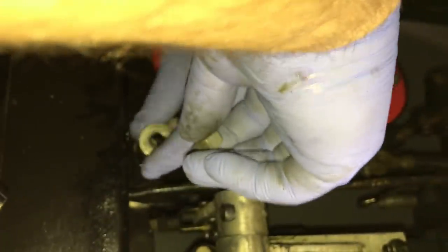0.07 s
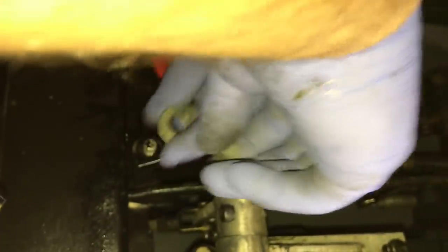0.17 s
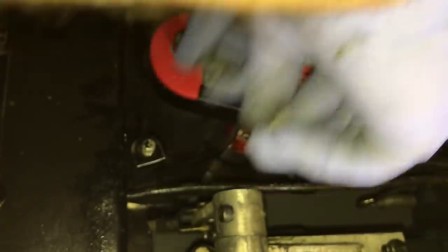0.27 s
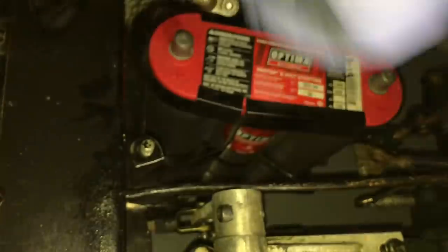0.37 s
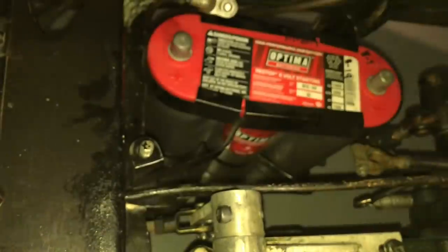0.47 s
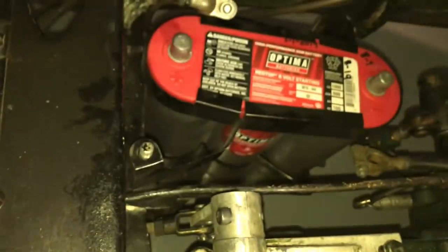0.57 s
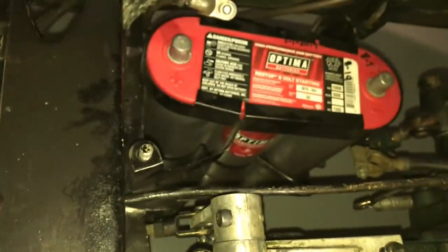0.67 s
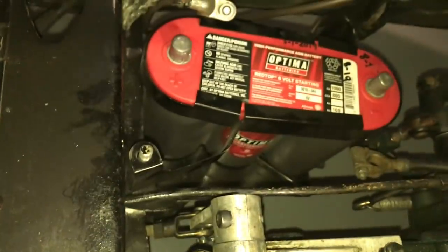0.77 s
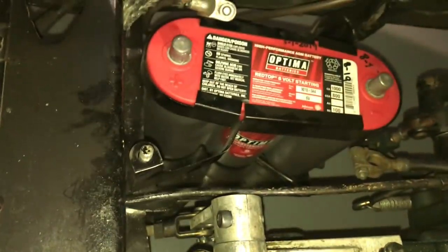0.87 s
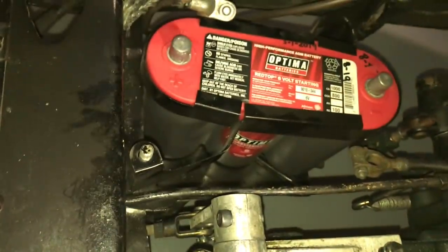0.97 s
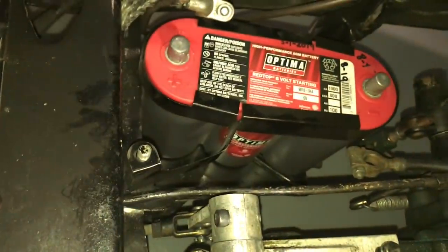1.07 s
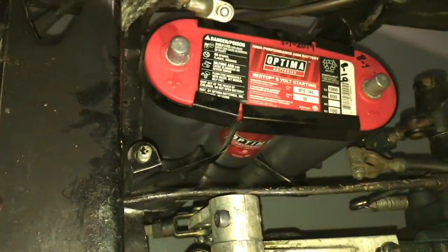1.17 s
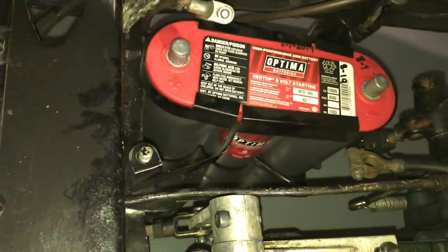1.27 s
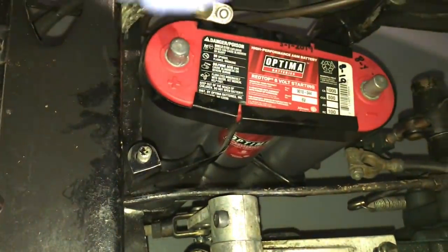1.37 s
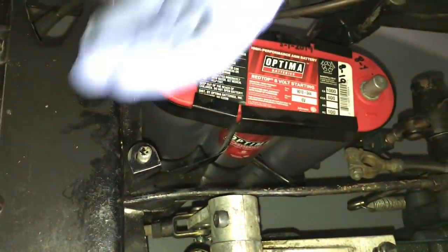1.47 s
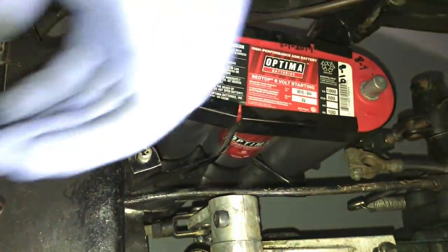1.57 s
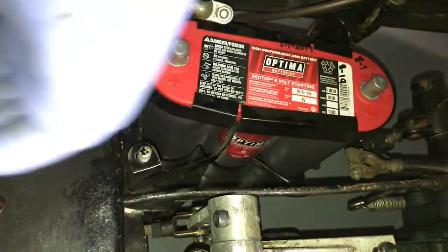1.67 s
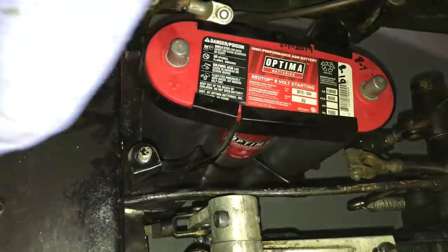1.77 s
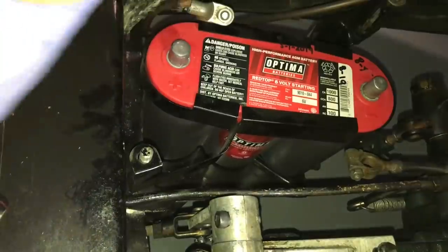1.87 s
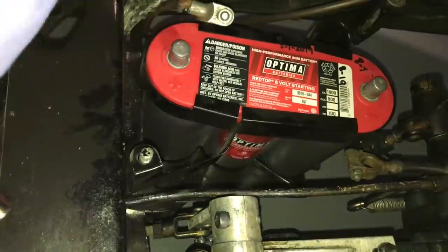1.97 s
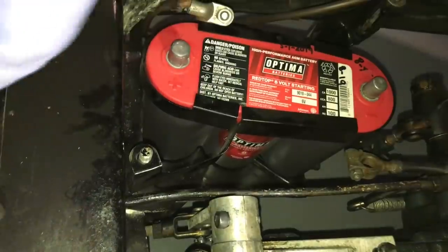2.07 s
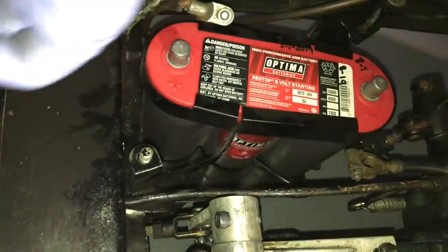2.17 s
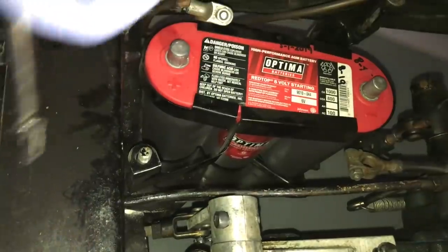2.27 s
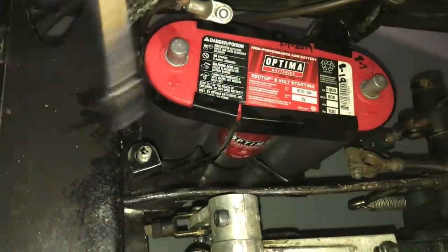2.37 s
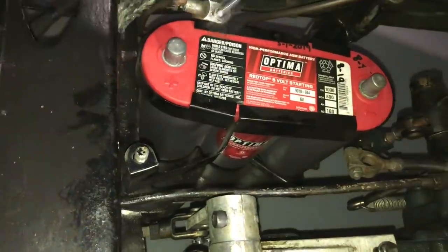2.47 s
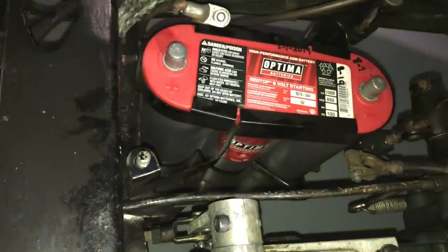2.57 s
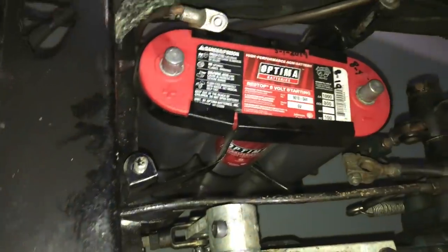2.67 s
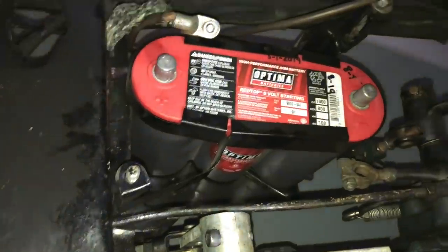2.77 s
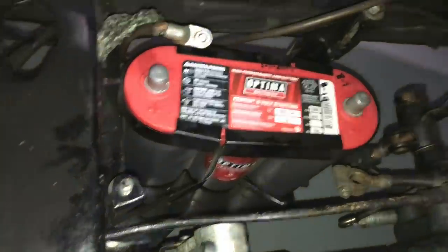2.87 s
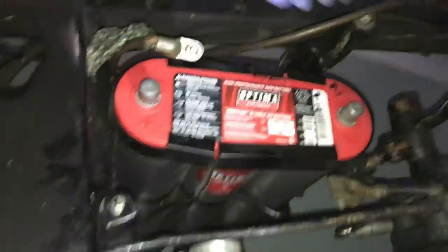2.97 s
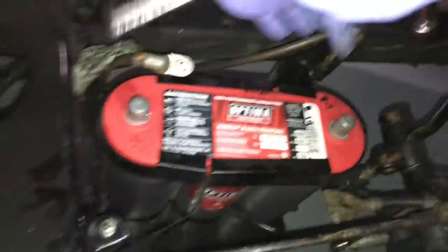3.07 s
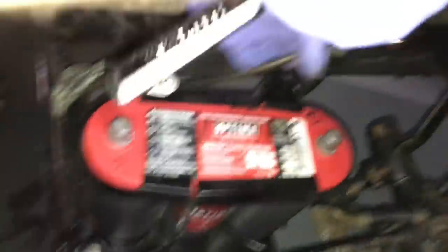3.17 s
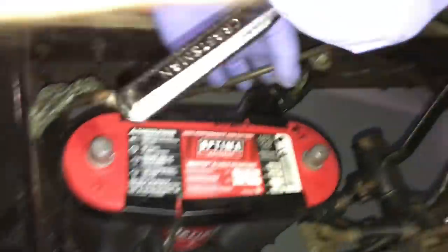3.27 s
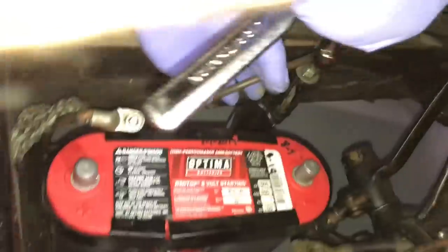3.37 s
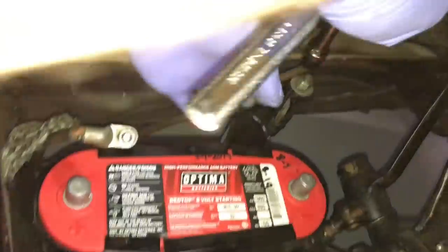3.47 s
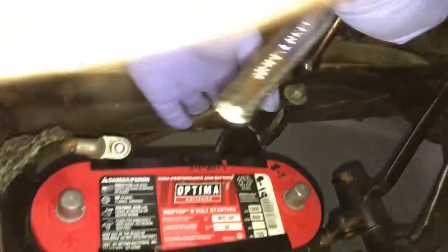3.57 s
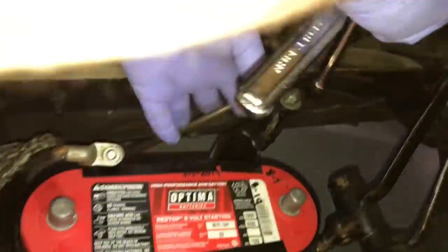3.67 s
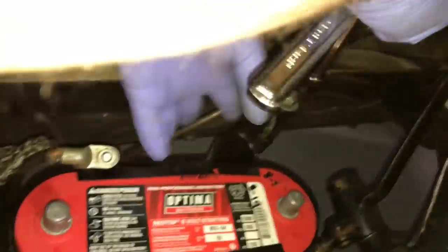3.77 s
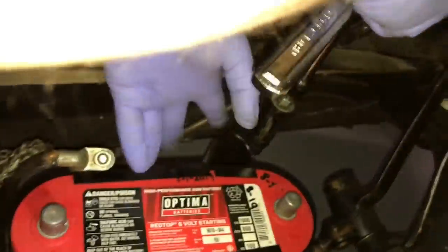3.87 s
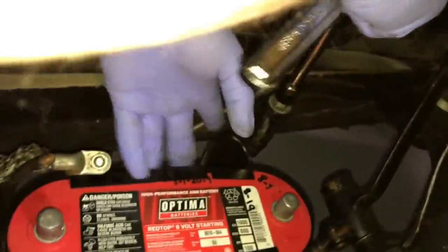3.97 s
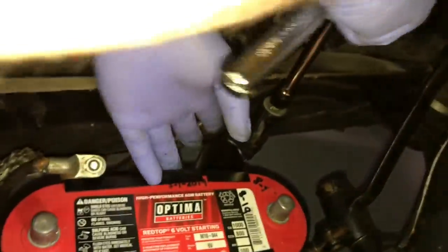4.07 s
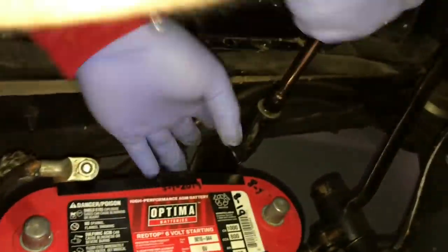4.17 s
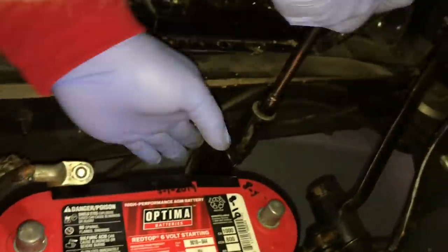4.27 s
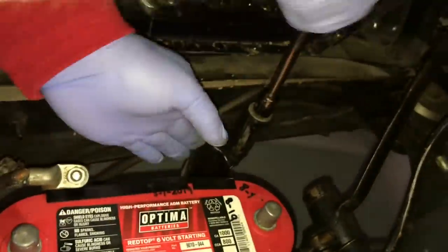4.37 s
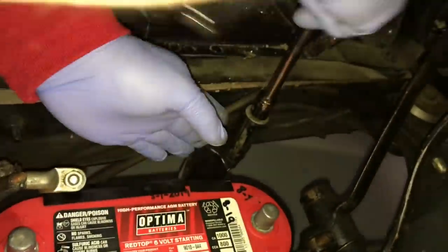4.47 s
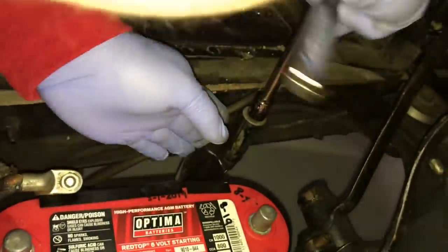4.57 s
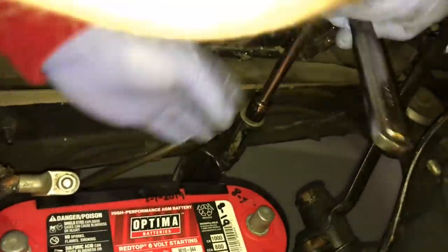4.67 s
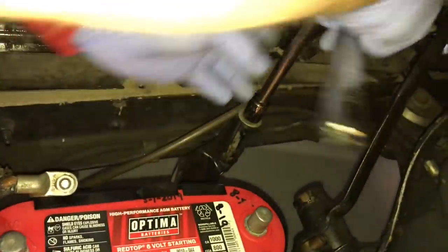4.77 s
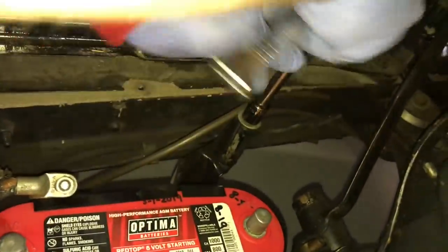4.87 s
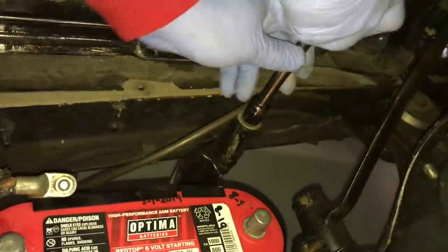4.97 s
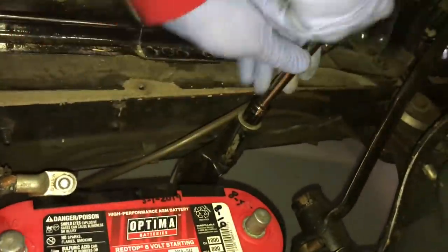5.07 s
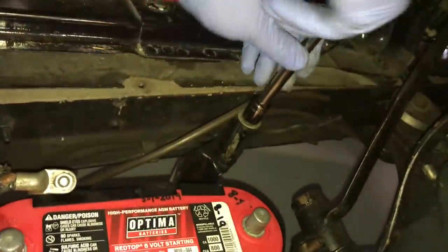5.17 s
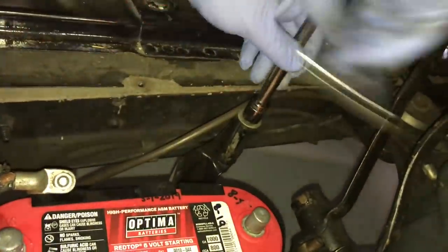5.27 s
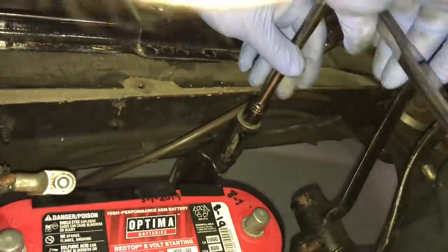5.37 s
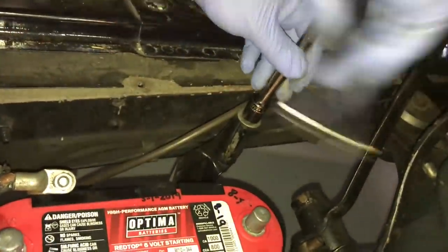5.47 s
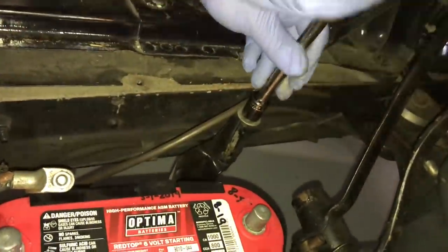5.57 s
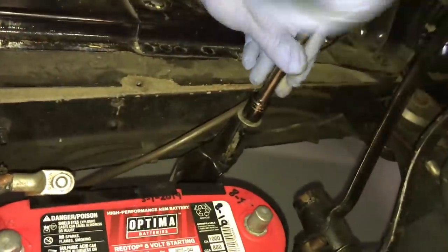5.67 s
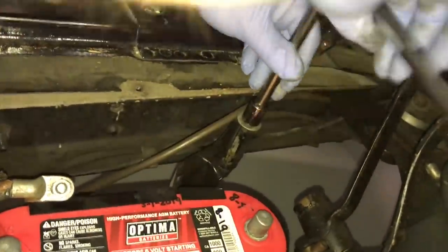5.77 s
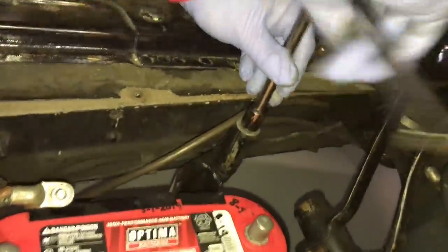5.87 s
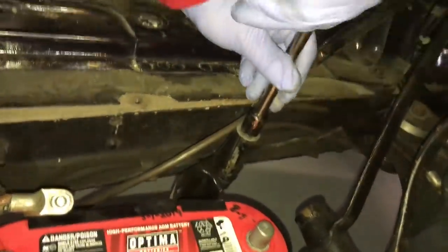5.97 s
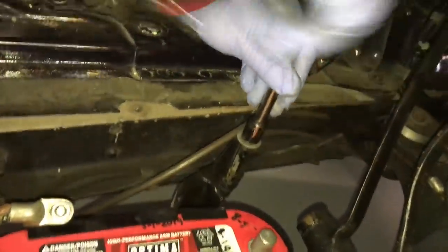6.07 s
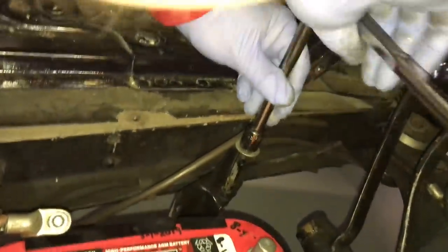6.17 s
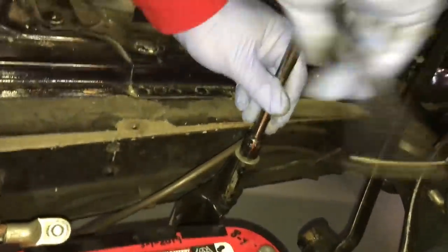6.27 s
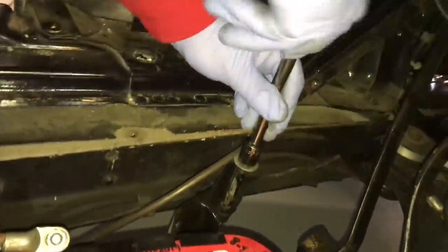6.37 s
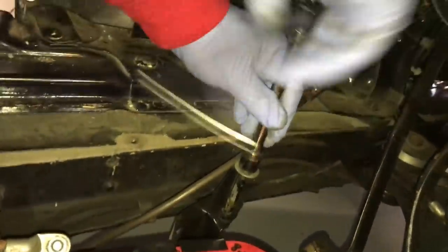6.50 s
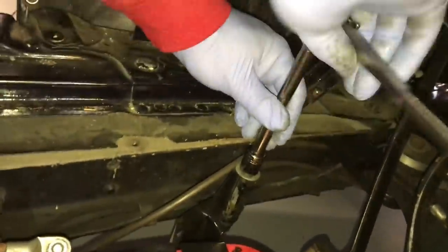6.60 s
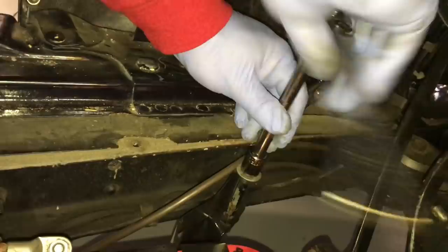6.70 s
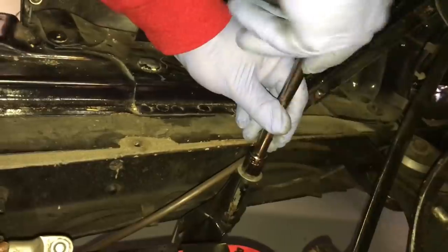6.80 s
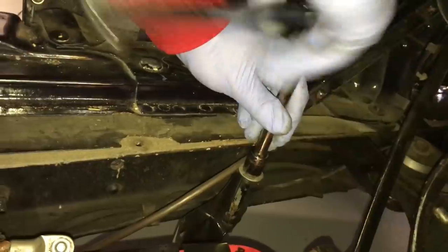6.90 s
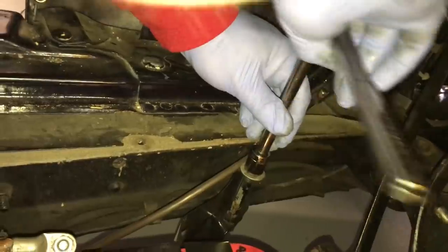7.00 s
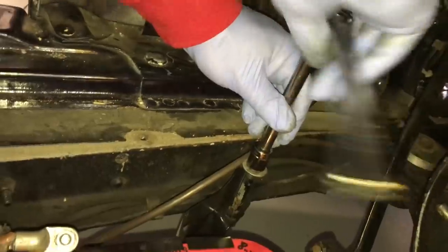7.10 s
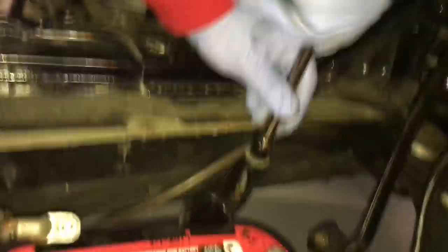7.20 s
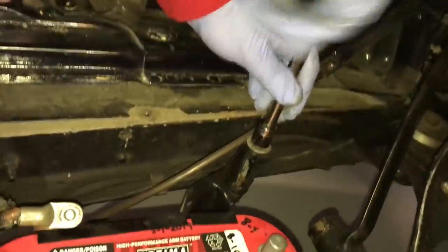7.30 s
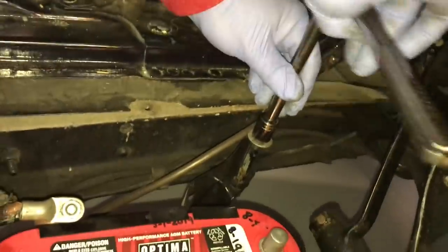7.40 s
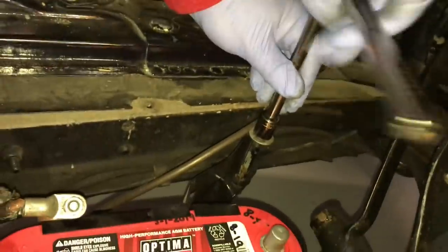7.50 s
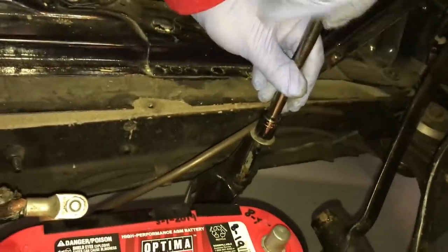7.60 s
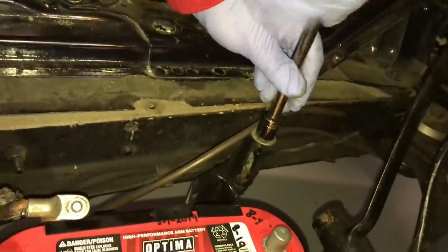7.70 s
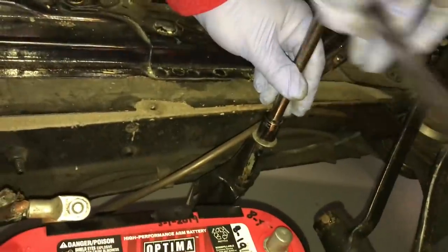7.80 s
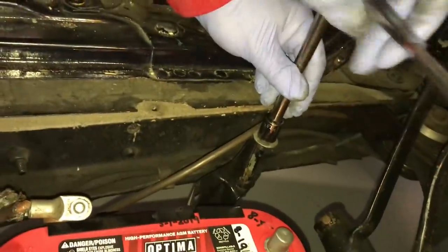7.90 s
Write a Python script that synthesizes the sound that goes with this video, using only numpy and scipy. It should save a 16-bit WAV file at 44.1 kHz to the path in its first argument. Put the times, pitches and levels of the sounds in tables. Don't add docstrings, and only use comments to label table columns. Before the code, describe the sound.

A quiet garage with a faint low hum, close microphone and short dull echo. At 0 s a part let go gives a soft sheet-metal clank; gloves rustle. Around 0.74 and 0.82 s a small nut touches metal, the second ring sharper and very high. Faint fumbling taps follow from 1.1 to 2.0 s, then at 2.06 s a loud, hard socket snap with a bright spring-ball click and quick settling. Sleeves brush and small ticks pass until 3.7 s. From 3.78 to 4.2 s the loose socket rattles brightly on the nut with dull bodywork knocks. At 4.8-5.0 s a slow swing gives separate clicks, with a knock at 5.13. From 5.4 s, quick runs of about seven to ten crisp clicks recur roughly every 0.4 s, slowing slightly within each run and ending in a knock, with rubbing between; the last run is cut off near 7.94 s.

```python
import sys
import numpy as np
from scipy import signal
from scipy.io import wavfile

SR = 44100
rng = np.random.default_rng(int(sys.argv[2]) if len(sys.argv) > 2 else 0)


def volts_from_decibels(level):
    exponent = np.asarray(level, float) / 20
    return 10 ** exponent


def digitize_waveform(pressure):
    field = np.atleast_2d(pressure).T
    bounded = np.clip(field, -1, 1)
    quanta = np.round(bounded * 32767).astype(np.int16)
    wavfile.write(sys.argv[1], SR, quanta)


N = 350154

ON_NUT_S, SEATED_S = 3.78, 4.78

# mode_hz, level_db, t60_s
HEAD_MODES = [(5920, -3, .045), (6620, -5, .045), (7480, -8, .04), (8100, -13, .025), (9010, -1, .045),
              (9920, -3, .04), (10900, -8, .035), (11700, -9, .025), (12500, -8, .025), (13300, -1, .03),
              (13900, -7, .025), (14700, -3, .035), (15400, -8, .03)]
# mode_hz, level_db, t60_s
EXTENSION_MODES = [(1898, -3, 0.23), (2350, -6, 0.15), (2540, -6.5, 0.18), (2980, 3.5, 0.057),
                   (3490, 3, 0.062), (4120, -3, 0.06), (4340, 4.5, 0.037), (4660, 5, 0.029),
                   (5850, -9.5, 0.019), (5160, -16.5, 0.18)]
# mode_hz, level_db, t60_s
BRACKET_MODES = [(620, -15, 0.04), (597, -7.5, 0.17), (726, -8.5, 0.35), (865, 1.5, 0.12), (1045, -1, 0.25),
                 (1204, 9, 0.053), (1830, -19.5, 0.027)]
# mode_hz, level_db, t60_s
DRIVE_MODES = [(5970, 18.5, 0.065), (6360, -7.5, 0.024), (6920, 13, 0.037), (8060, 15.5, 0.071),
               (8360, -15, 0.026), (10380, -25, .03), (12000, -32.5, 0.015), (13200, -30, 0.017)]


def rows(table):
    return np.transpose(table).astype(float)


def band(x, low_hz, high_hz):
    return signal.sosfilt(signal.butter(2, [low_hz, min(high_hz, .45 * SR)], "band", fs=SR, output="sos"), x)


def fade(x, seconds):
    return signal.lfilter([1], [1, -np.exp(-1 / (max(seconds, 1e-5) * SR))], x)


def drift(rate_hz):
    time_constant_s = 1 / (2 * np.pi * rate_hz)
    slow = fade(fade(rng.standard_normal(N + SR), time_constant_s), time_constant_s)[SR:]
    return slow / slow.std()


def resonate(x, hz, t60_s):
    r, w = volts_from_decibels(-60 / (t60_s * SR)), 2 * np.pi * hz / SR
    return np.sqrt(2 - 2 * r * r) * signal.lfilter([0, np.sin(w)], [1, -2 * r * np.cos(w), r * r], x)


def swell(table):
    t = np.arange(N) / SR
    return sum(volts_from_decibels(db) * np.exp(-((t - s) / half) ** 2) for s, half, db in table)


def strike(times, level_db, modes, width_hz, crack_db, crack_s, rise_s, scatter_db=3.5):
    at = np.minimum((times * SR).astype(int), N - 1)
    hz, mode_db, t60_s = rows(modes)
    share = volts_from_decibels(mode_db + scatter_db * rng.standard_normal((len(at), len(hz))))
    share = share / np.sqrt((share ** 2).sum(axis=1, keepdims=True))
    blows = np.zeros(N) + 1e-18
    blows[at] = volts_from_decibels(level_db + crack_db) / (1 + rise_s * SR)
    out = fade(fade(blows, rise_s), crack_s) * rng.standard_normal(N)
    white = rng.standard_normal((2, N))
    for k in range(len(hz)):
        blows[at] = volts_from_decibels(level_db) * share[:, k] / (1 + rise_s * SR)
        rattle = fade(fade(blows, rise_s), t60_s[k] / np.log(1000)) * white[k % 2]
        out += resonate(rattle, hz[k], np.log(1000) / (np.pi * width_hz))
    low_hz, high_hz = .6 * hz.min(), 1.3 * hz.max()
    return band(band(out, low_hz, high_hz), low_hz, high_hz)


def hum():
    # start_s, level_db
    thumps = [
        (3.556, -33),
        (4.615, -38),
        (7.17, -39),
    ]
    # centre_s, level_db
    sways = [
        (0.0, -60),
        (.57, -77.5),
        (1.88, -59.5),
        (5.44, -47),
        (6.5, -50),
        (7.94, -58),
    ]
    sway_s, thump_rise_s, thump_fall_s = 0.066, 0.0019, 0.016
    s, thump_db = rows(thumps)
    push = np.zeros(N)
    push[(s * SR).astype(int)] = volts_from_decibels(thump_db)
    thump = fade(fade(push, thump_fall_s), thump_rise_s) / (thump_rise_s * SR)
    t = np.arange(N) / SR
    sway = sum(volts_from_decibels(db) * np.exp(-((t - at) / sway_s) ** 2) for at, db in sways)
    murmur = volts_from_decibels(-62 + 6.5 * (t > ON_NUT_S) + drift(3.7))
    low = band(rng.standard_normal(N), 45.5, 109)
    motor = volts_from_decibels(-67) * resonate(rng.standard_normal(N), 152, .1)
    return low / low.std() * (murmur + sway + thump) + motor


def garage(x):
    t60_s, level_db, onset_s = 0.21, -19.5, 0.00095
    t = np.arange(SR // 2) / SR
    tail = band(rng.standard_normal(len(t)), 200, 4900) * volts_from_decibels(-60 * t / t60_s) * (1 - np.exp(-t / onset_s))
    return volts_from_decibels(level_db) * signal.fftconvolve(x, tail / np.sqrt((tail ** 2).sum()))[:N]


def rustle_levels():
    # time_s, level_db
    hands = [(0, -63.5), (.5, -60.5), (.73, -58.5), (.9, -67), (1.5, -68), (1.66, -64.5), (1.9, -62.5),
             (2.25, -54.5), (2.45, -67), (3.05, -62.5), (3.2, -59), (3.56, -53.5), (4.0, -64), (4.27, -71),
             (4.85, -49.5), (5.32, -67), (5.45, -63), (7.94, -58)]
    # peak_s, level_db
    loads = [(3.3, -59.5), (3.96, -40.5), (4.129, -36.5), (4.45, -52), (4.88, -52), (5.22, -48),
             (5.6, -45.5), (6.0, -46.5), (6.382, -41), (6.85, -42.5), (7.24, -48), (7.74, -52.5)]
    # level_re_hands_db, share of the hands' swing [ratio], level_re_load_db
    layer_mix = [
        (-3, 0.91, 1.5),
        (-0.5, 0.93, -23),
        (-3.5, 0.59, -22),
    ]
    rise_s, fall_s = 0.073, 0.11
    t = np.arange(N) / SR
    hands_db = np.interp(t, *rows(hands))
    load = sum(volts_from_decibels(db) * np.exp(np.minimum((t - s) / rise_s, (s - t) / fall_s)) for s, db in loads)
    mean_db = hands_db.mean()
    return [volts_from_decibels(mean_db + hands_re_db + share * (hands_db - mean_db)) + volts_from_decibels(load_re_db) * load
            for hands_re_db, share, load_re_db in layer_mix]


def rustle(patchy_db=1.5, grain_db=3, grains_per_s=900, steel_db=-7):
    # band_hz, density_db [dB per Hz]
    colour = [(76, -31), (130, 6.5), (216, 1.5), (404, 14.5), (448, -21), (582, -12), (774, -9.5),
              (1810, -14.5), (4890, -17), (12700, -25), (15500, -19.5), (16500, -49)]
    # mode_hz, level_db
    sung_modes = [(1200, -1), (2500, -7), (3500, -4), (3700, -1), (4350, 1.5), (6100, -4)]
    in_hand_s, grind_db = 1.78, 4
    hz, colour_db = rows(colour)
    grains = (rng.random(N) < grains_per_s / SR) * volts_from_decibels(grain_db * np.minimum(rng.exponential(1, N), 4))
    white = rng.standard_normal((2, N)) * (1 + 0.15 * fade(grains, 0.00094))
    layers = np.zeros((3, N))
    together = drift(14)
    edges = 15900 / 2 ** np.arange(7, -.1, -.5)
    for k, (low, high) in enumerate(zip(edges, edges[1:])):
        centre = np.sqrt(low * high)
        centre_db = np.interp(np.log(centre), np.log(hz), colour_db)
        gain = volts_from_decibels(centre_db + patchy_db * (together + drift(3.1)))
        layers[np.searchsorted([500, 4500], centre)] += gain * band(white[k % 2], low, high)
    layers[0] = band(layers[0], 110, 430)
    layers /= layers.std(axis=1, keepdims=True)
    t = np.arange(N) / SR
    singing = sum(volts_from_decibels(db + 3.5 * drift(3)) * resonate(white[0], mode_hz, .022) for mode_hz, db in sung_modes)
    layers[1] += volts_from_decibels(steel_db + grind_db * (t > SEATED_S)) * (t > in_hand_s) * singing / singing.std()
    return sum(gain * layer for gain, layer in zip(rustle_levels(), layers))


def swishes():
    # centre_s, half_length_s, level_db
    brushes = [(0.752, 0.16, -59.5), (3.625, 0.11, -56), (5.015, 0.17, -60), (6.37, 0.055, -47.5),
               (7.555, 0.1, -52), (2.672, 0.028, -56.5), (2.748, 0.055, -58.5), (3.032, 0.02, -49),
               (3.135, 0.024, -51.5), (3.237, 0.016, -55), (3.963, 0.017, -46), (7.45, 0.015, -50),
               (7.862, 0.013, -50.5)]
    # centre_s, half_length_s, level_db
    rubs = [(1.14, 0.027, -65), (1.43, 0.025, -68), (1.68, 0.054, -77), (3.2, 0.063, -58.5),
            (4.44, .06, -58.5), (4.72, 0.045, -52.5), (5.06, 0.1, -51.5), (5.285, .012, -55.5)]
    # centre_s, half_length_s, level_db
    slides = [
        (.94, 0.075, -68),
        (1.87, 0.23, -60),
        (4.57, 0.089, -62),
        (5.05, 0.12, -55.5),
    ]
    # mode_hz, level_db
    sliding_modes = [(1020, 1), (2290, -8.5), (3200, -1), (3570, -5), (4100, -2), (4320, -9), (5550, -6),
                     (6140, -12.5)]
    hiss = band(band(rng.standard_normal(N), 5100, 18000), 2500, 18000)
    rub = band(rng.standard_normal(N), 870, 5000) * volts_from_decibels(2.7 * drift(30))
    white = rng.standard_normal(N)
    song = sum(volts_from_decibels(db + 3.0 * drift(8)) * resonate(white, mode_hz, .05) for mode_hz, db in sliding_modes)
    return swell(brushes) * hiss / hiss.std() + swell(rubs) * rub / rub.std() + swell(slides) * song / song.std()


def loose_parts():
    # start_s, level_db
    clank = [(.0003, -33)]
    # mode_hz, level_db, t60_s
    sheet_modes = [(474, 0, 0.29), (730, 5.5, 0.21), (1270, 4.5, 0.17), (1950, -8, 0.19), (2379, -20, 0.12),
                   (3000, -30, 0.45), (4000, -1, 0.12), (4700, 2, 0.083), (6100, -15, 0.11),
                   (6160, -25, 0.097)]
    # start_s, level_db
    nut_touches = [
        (.7357, -26),
        (.824, -17.5),
        (.8268, -44),
        (1.5095, -43),
        (1.632, -42),
        (1.663, -46),
    ]
    # mode_hz, level_db, t60_s
    nut_modes = [(2500, -34, .015), (7200, -16, .015), (9313, -10, .015), (12080, -16, .04),
                 (12900, -6, .035), (13200, 0, .04), (13270, -17, .2), (13400, -6, .04), (14800, -10, .015)]
    # start_s, level_db
    snap = [
        (2.0623, -7),
        (2.0643, -10),
        (2.0708, -10),
        (2.080, -19),
        (2.14, -48),
    ]
    # mode_hz, level_db, t60_s
    socket_modes = [(330, -14, .07), (570, -2, .08), (715, -1, .07), (1360, -1, .06), (1900, -9, .07),
                    (2420, -4, .065), (2950, -7, .05), (3380, -3, .045), (3570, 1, .045), (3800, 0, .04),
                    (4580, -7, .06), (5020, -7, .07), (5640, -1, .04), (6270, -10, .09)]
    # start_s, level_db
    ball_snap = [
        (2.0623, -11),
        (2.0643, -10),
        (2.0708, -22),
        (2.080, -28),
        (2.14, -50),
    ]
    # mode_hz, level_db, t60_s
    ball_modes = [(8700, -3.5, 0.07), (11300, -8, 0.026), (13270, 11.5, .025), (14100, 2, .045),
                  (15100, -10.5, .03)]
    # start_s, pitch_hz, level_db,
    # t60_s
    pings = [(.0003, 2379, -38, 0.2), (.0003, 6202, -40, 0.097), (2.065, 5080, -60, 1.2),
             (3.778, 7200, -39, 0.14), (4.015, 7200, -36, 0.13), (4.0135, 8150, -24, .035),
             (4.1182, 6150, -21, .04), (5.846, 3100, -36, .05), (5.846, 6300, -37, .05)]
    out = strike(*rows(clank), sheet_modes, width_hz=220, crack_db=6, crack_s=.012, rise_s=.0002)
    out += strike(*rows(nut_touches), nut_modes, width_hz=120, crack_db=-8, crack_s=.0015, rise_s=.0002)
    out += strike(*rows(snap), socket_modes, width_hz=150, crack_db=5, crack_s=.003, rise_s=.0003, scatter_db=2)
    out += strike(*rows(ball_snap), ball_modes, width_hz=300, crack_db=3, crack_s=.002, rise_s=.0003, scatter_db=2)
    for s, hz, level_db, t60_s in pings:
        start = int(s * SR)
        t = np.arange(N - start) / SR
        out[start:] += volts_from_decibels(level_db - 60 * t / t60_s) * np.sin(2 * np.pi * hz * t)
    return out


def contacts():
    # start_s, bright_db, steel_db, bracket_db, bodywork_db
    handling = [(1.076, -71, -75, -54.5, -54.5), (1.495, -88, -85, -61, -36), (1.515, -90, -89, -63, -49),
                (1.535, -86, -78, -71, -48), (1.6296, -75, -45, -39, -41), (1.642, -80, -48, -51, -45),
                (1.66, -80, -62, -53, -36), (1.69, -80, -59, -51, -45), (1.9278, -82, -44, -45, -32.5),
                (1.97, -46, -42, -45, -31.5), (2.0071, -65.5, -56, -37, -32.5), (2.022, -60, -43, -34, -30),
                (2.046, -51, -30.5, -29, -46.5), (2.432, -55, -61, -62, -70.5),
                (2.529, -33.5, -53, -76.5, -77), (2.7212, -38, -47, -59, -64.5),
                (3.013, -40.5, -56.5, -52, -54.5), (3.2687, -76.5, -60.5, -43.5, -71.5),
                (3.505, -40.5, -47, -47.5, -34), (3.555, -41, -71, -58, -63), (3.62, -45, -50, -51.5, -64)]
    # start_s, bright_db, steel_db,
    # bracket_db, bodywork_db
    seating = [(3.759, -53, -49, -42, -43), (3.777, -23, -15.5, -51, -27.5), (3.861, -46, -32, -48, -23),
               (3.877, -52, -36.5, -69, -37), (3.9265, -55, -33.5, -61, -49), (3.96, -60, -45, -69, -38),
               (4.13, -59, -63, -56, -30), (4.002, -27, -26.5, -55, -36), (4.0133, -16, -38, -38, -55),
               (4.072, -17.5, -29, -41, -67), (4.0938, -36, -29, -40, -15), (4.19, -75, -69, -67, -22.5),
               (4.3377, -76, -45.5, -43, -37.5), (4.611, -42.5, -66, -46.5, -34),
               (4.6963, -71, -57, -43.5, -31.5), (4.7561, -23.5, -29.5, -41.5, -26),
               (4.957, -76, -50, -45, -26.5), (7.322, -53, -48.5, -48, -34.5), (7.837, -56, -62, -44, -49)]
    # start_s, bright_db, steel_db
    ticks = [(1.178, -75, -59.5), (1.31, -69, -62.5), (1.44, -75, -61.5), (1.462, -74, -77),
             (3.127, -54, -62), (3.165, -63, -55), (3.205, -68, -54), (3.235, -66, -58), (4.53, -49.5, -75),
             (5.21, -70, -60), (5.245, -58, -57), (5.428, -40, -39.5), (7.501, -38, -42.5),
             (7.61, -23, -44), (6.803, -36, -68), (7.217, -47, -69), (1.771, -59.5, -54),
             (2.85, -45.5, -66), (5.746, -67, -54.5), (5.765, -49, -70), (5.804, -44, -49),
             (6.0494, -41, -74), (6.144, -49, -56), (6.19, -40, -75), (6.2074, -49, -53), (6.879, -54, -51),
             (6.992, -58, -58)]
    # touch_s, tick_s, tick_db, sliding_steel_db
    take_ups = [(5.393, 5.406, -22, -33), (5.833, 5.845, -29.5, -35), (6.216, 6.2234, -26.5, -37.5),
                (6.632, 6.653, -18, -30.5), (7.067, 7.063, -27, -34.5), (7.462, 7.4745, -34, -38),
                (7.871, 7.886, -24.5, -38)]
    # bright_re_tick_db, then steel_db, bracket_db, bodywork_db re sliding steel
    take_up_shape = [
        (-30, -4.5, -10.5, -8),
        (0, -1, -17.5, -36),
        (-8, -4.5, -26, 2),
    ]
    # stop_s, warning_lead_s, bright_db, steel_db, bodywork_db
    stops = [(5.1355, 0.0017, -37, -35, -34), (5.6012, 0.037, -25, -33, -36), (6.01, 0.028, -18, -28, -24),
             (6.4111, 0.023, -13.5, -29.5, -29), (6.8192, 0.0134, -19, -29, -36),
             (7.2368, 0.012, -14, -31, -28.5), (7.656, 0.029, -12, -31.5, -31)]
    # bright_db, steel_db, bracket_db (re steel), bodywork_db, added to the stop's own levels
    stop_shape = [
        (-16, -11.5, -12, -27),
        (-3.5, -0.5, -3.5, 3),
        (-33, -48, -23.5, -3),
    ]
    bedding_s, rebound_s = 0.018, 0.033
    out = [*handling, *seating]
    for s, bright_db, steel_db in ticks:
        out.append((s, bright_db, steel_db, steel_db, steel_db))
    for touch, tick, tick_db, steel_db in take_ups:
        for s, shape in zip((touch, tick, tick + bedding_s), take_up_shape):
            out.append((s, *np.add(shape, (tick_db, steel_db, steel_db, steel_db))))
    for stop, lead, bright_db, steel_db, body_db in stops:
        for s, shape in zip((stop - lead, stop, stop + rebound_s), stop_shape):
            out.append((s, *np.add(shape, (bright_db, steel_db, steel_db, body_db))))
    return rows(out)


def knocks():
    # mode_hz, level_db, t60_s
    body_modes = [(164.1, -13, 0.71), (229, 2, 0.044), (260.5, -1.5, 0.24), (303.3, 5, 0.076),
                  (367.5, -0.5, 0.15), (410, -12.5, 0.037), (577, -3.5, 0.089)]
    s, bright_db, steel_db, bracket_db, body_db = contacts()
    loose = (s > ON_NUT_S - .1) & (s < SEATED_S)
    drive = strike(s[loose], bright_db[loose] - 8, DRIVE_MODES, width_hz=380, crack_db=-3, crack_s=.004, rise_s=.0008)
    bright = strike(s[~loose], bright_db[~loose] - 9, HEAD_MODES, width_hz=600, crack_db=1.5, crack_s=.002, rise_s=.002)
    steel = strike(s, steel_db + 1.5, EXTENSION_MODES, width_hz=260, crack_db=-1, crack_s=.008, rise_s=.002)
    bracket = strike(s, bracket_db + 1.5, BRACKET_MODES, width_hz=60, crack_db=13, crack_s=.012, rise_s=.004)
    body = strike(s, body_db - 4, body_modes, width_hz=23, crack_db=7, crack_s=.0067, rise_s=.0034)
    return drive + bright + steel + bracket + body


def ratchet(head_trim_db=-2.0, extension_trim_db=-2.0):
    # start_s, head_db, extension_db
    creep = [(4.118, -19, -26), (4.1566, -27, -33), (4.8, -23, -27), (4.849, -19, -23), (4.8824, -17, -23),
             (4.9329, -17, -27), (4.9805, -19, -28), (5.5625, -25, -32)]
    # start_s, head_db, extension_db
    teeth = [(5.4353, -12.5, -27), (5.4486, -29.5, -20), (5.4604, -11, -27), (5.4756, -20, -22),
             (5.4883, -16.5, -31), (5.505, -20.5, -36), (5.5231, -17.5, -35), (5.862, -17, -21.5),
             (5.8761, -14, -24.5), (5.887, -16, -26.5), (5.9, -23, -26.5), (5.9145, -21, -27),
             (5.9284, -16.5, -27), (5.949, -23, -33), (6.256, -14, -22), (6.2694, -19, -24.5),
             (6.2802, -19, -32), (6.2906, -17.5, -20), (6.3018, -23, -27), (6.3143, -26, -25.5),
             (6.3293, -19.5, -28), (6.3483, -19.5, -27.5), (6.676, -16.5, -19), (6.6878, -18.5, -19),
             (6.6993, -23, -26), (6.7097, -15.5, -24), (6.7197, -22, -21.5), (6.7294, -12, -27.5),
             (6.7404, -19, -16.5), (6.7497, -18, -27), (6.762, -26, -39), (6.7754, -24, -30),
             (7.1, -19, -19.5), (7.1134, -16, -16.5), (7.124, -18, -31), (7.1385, -18, -19),
             (7.1507, -18, -26), (7.1676, -21.5, -34), (7.1907, -22, -29.5), (7.5095, -15.5, -24.5),
             (7.522, -17.5, -26), (7.535, -23, -22.5), (7.552, -24.5, -25.5), (7.5707, -28, -33),
             (7.5929, -18.5, -21.5), (7.6174, -20, -25), (7.912, -17, -23), (7.9257, -17, -24),
             (7.9368, -13.5, -27)]
    s, head_db, extension_db = rows([*creep, *teeth])
    head = strike(s, head_db, HEAD_MODES, width_hz=330, crack_db=9, crack_s=.00075, rise_s=.00037, scatter_db=4.5)
    extension = strike(s, extension_db + extension_trim_db, EXTENSION_MODES[4:],
                       width_hz=400, crack_db=5.5, crack_s=.0022, rise_s=.00017)
    lows = strike(s, extension_db - 20, EXTENSION_MODES[:4], width_hz=300, crack_db=11, crack_s=.008, rise_s=.004)
    bracket = strike(s, extension_db - 18.5, BRACKET_MODES, width_hz=64, crack_db=-5.5, crack_s=.006, rise_s=.0015)
    slow = s < SEATED_S + .3
    drive = strike(s[slow], extension_db[slow] - 0.1, DRIVE_MODES,
                   width_hz=2000, crack_db=6, crack_s=.0035, rise_s=.000098)
    bite = strike(s[~slow], head_db[~slow] - 8.5, HEAD_MODES[9:12],
                  width_hz=500, crack_db=20, crack_s=.001, rise_s=.0005)
    return volts_from_decibels(head_trim_db) * (head + bite) + extension + lows + bracket + drive


def scene():
    metal = ratchet() + knocks() + loose_parts()
    return (metal + garage(metal) + rustle() + hum() + swishes())[None]


def top_cut(x):
    return signal.sosfilt(signal.butter(12, 16990, fs=SR, output="sos"), x)


def record(dry):
    thin = signal.sosfilt(signal.butter(2, 40, "high", fs=SR, output="sos"), dry)
    rounded = np.tanh(thin)
    cut = signal.sosfilt(signal.cheby2(10, 60, 16900, fs=SR, output="sos"), rounded)
    return top_cut(cut)


dry = scene()
out = record(dry)
digitize_waveform(out)
```